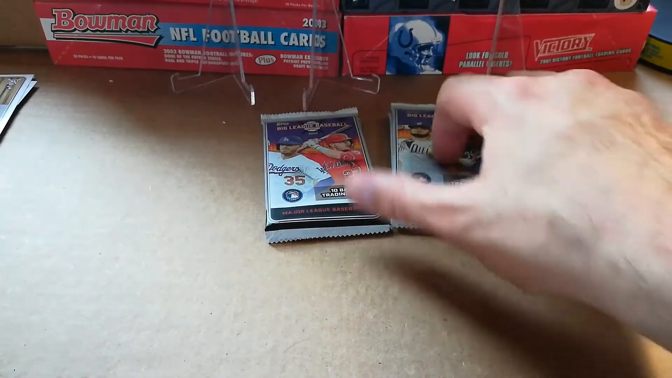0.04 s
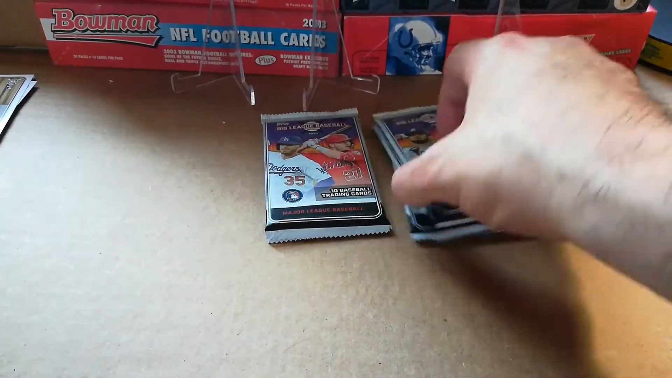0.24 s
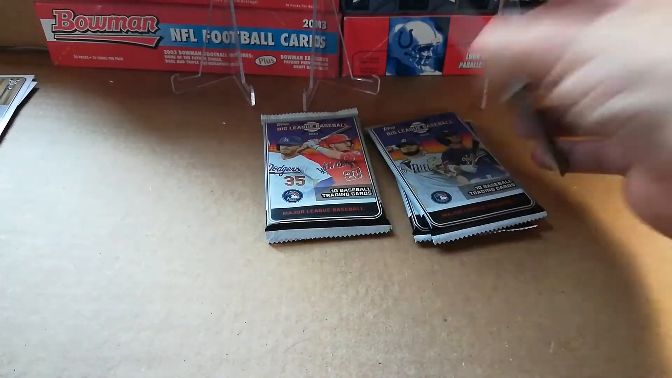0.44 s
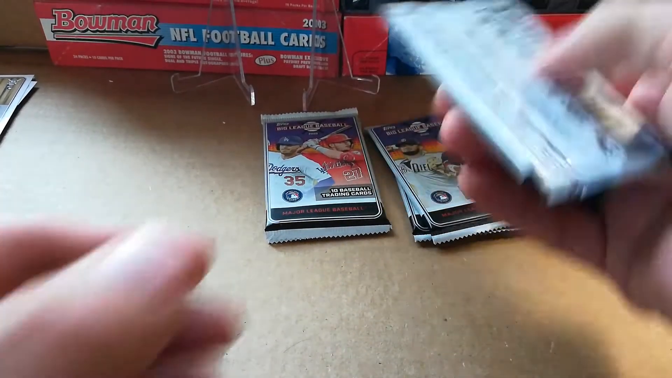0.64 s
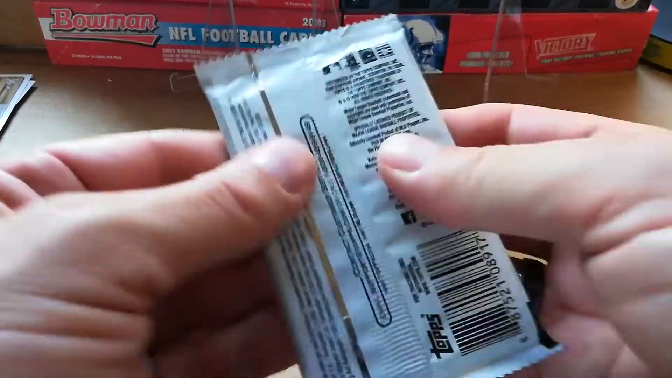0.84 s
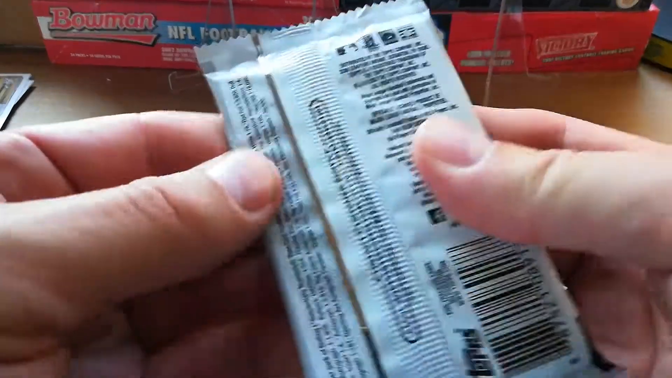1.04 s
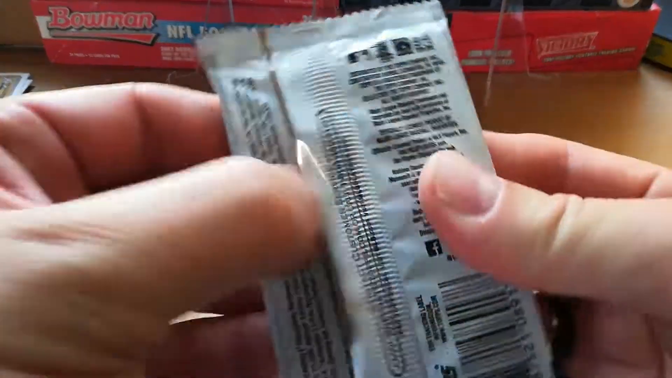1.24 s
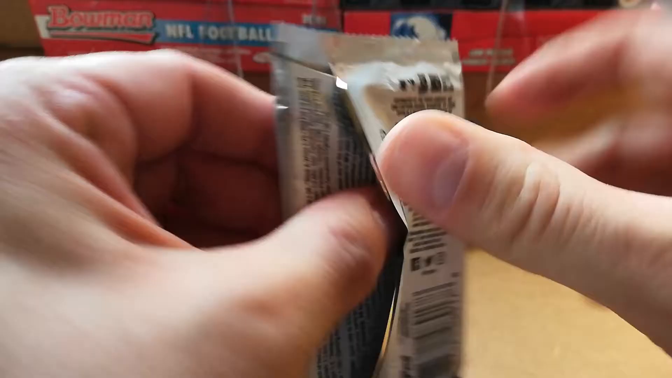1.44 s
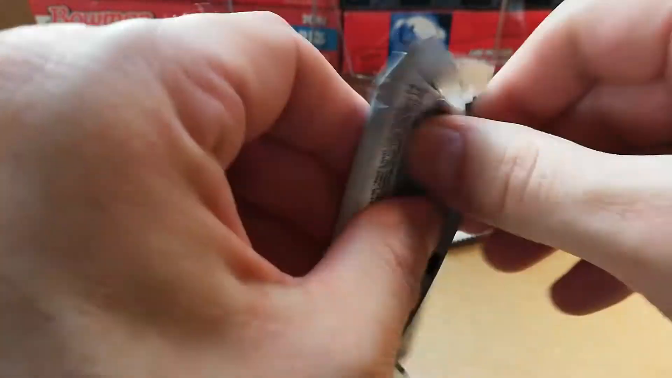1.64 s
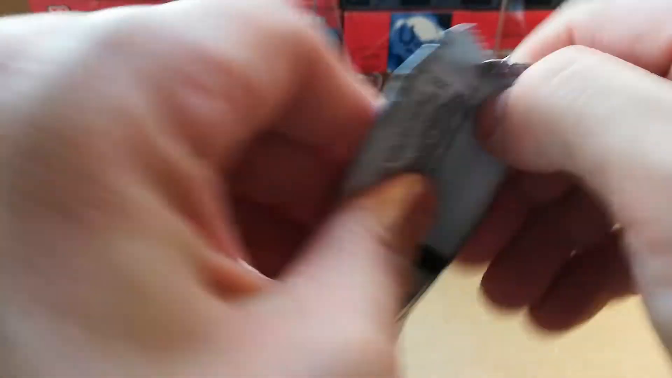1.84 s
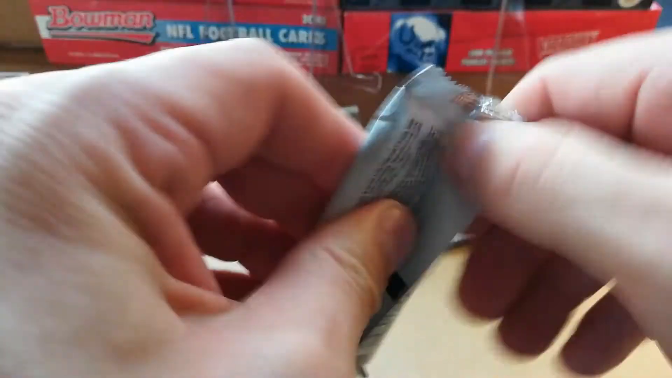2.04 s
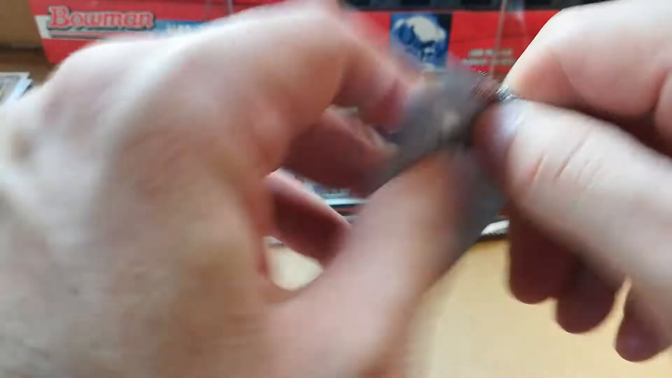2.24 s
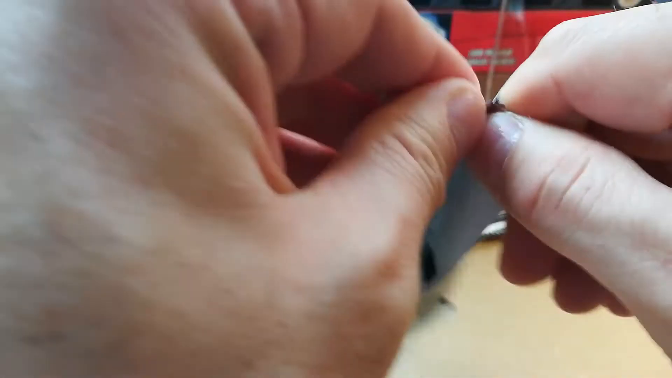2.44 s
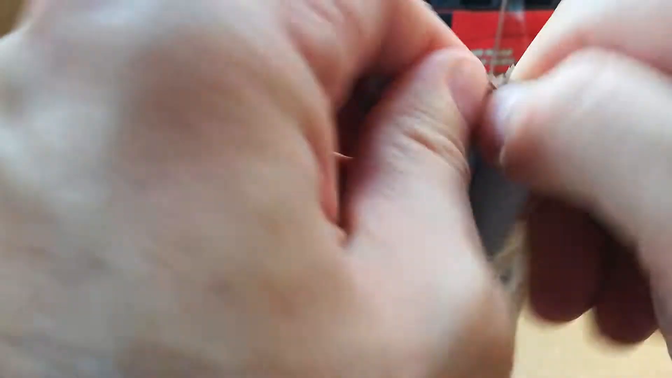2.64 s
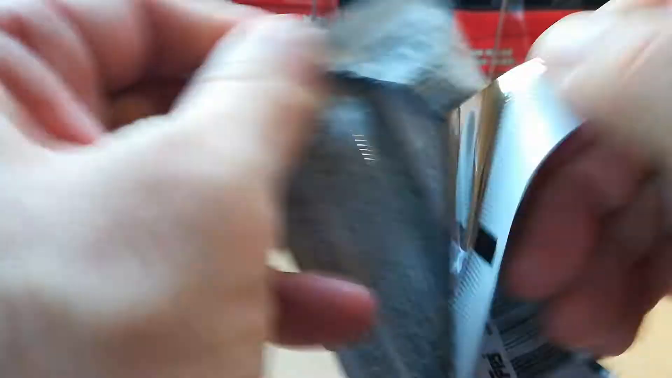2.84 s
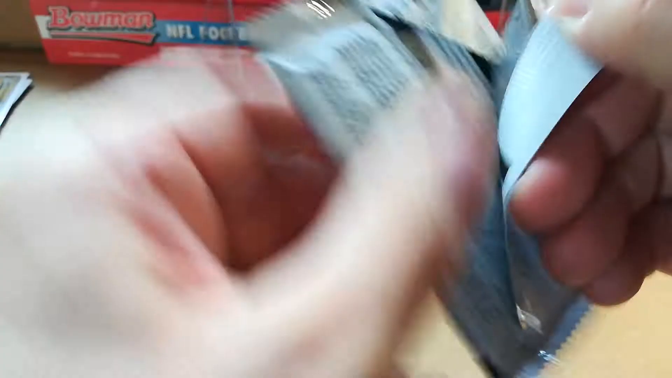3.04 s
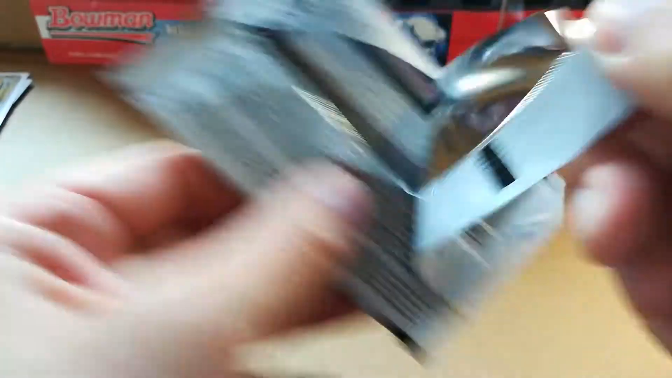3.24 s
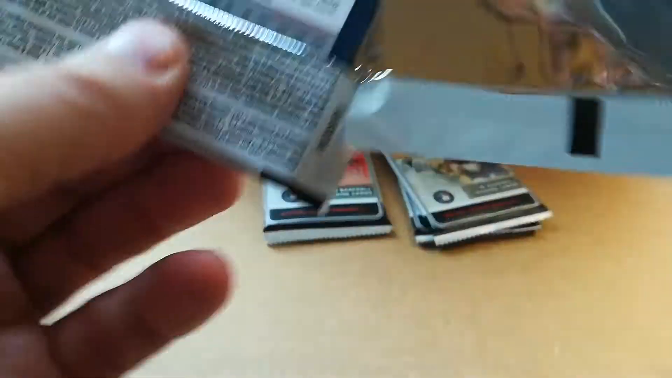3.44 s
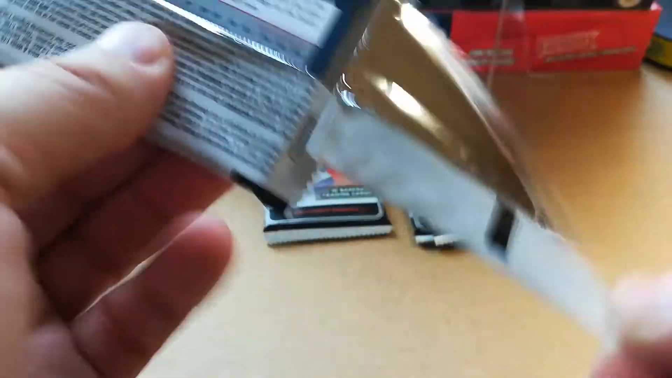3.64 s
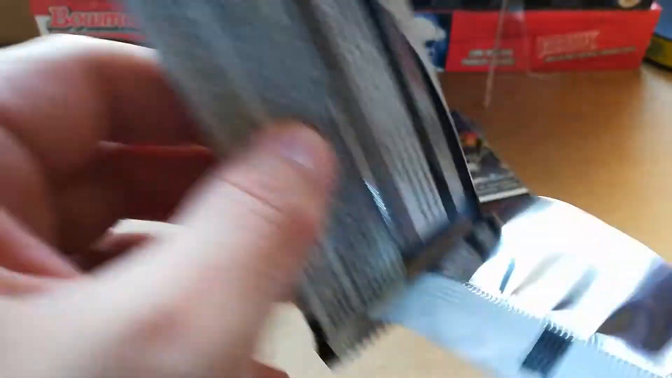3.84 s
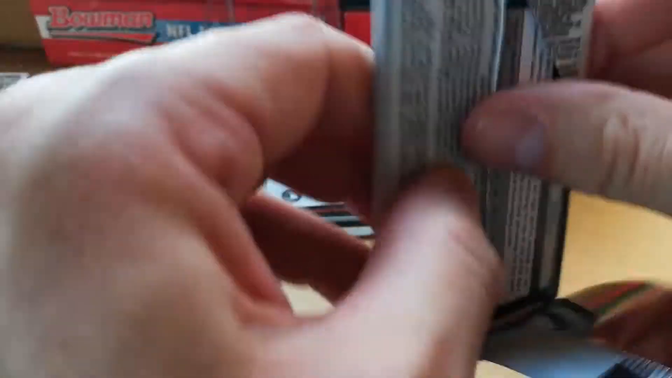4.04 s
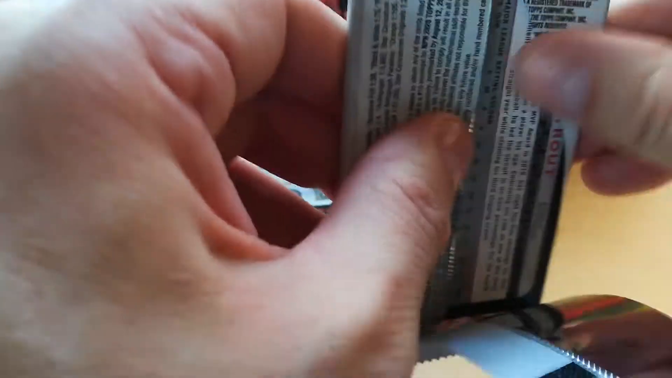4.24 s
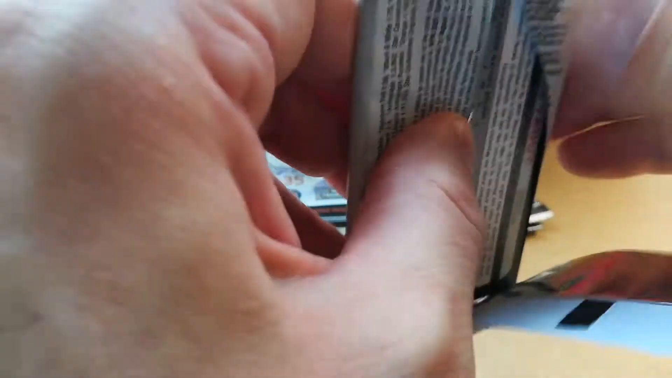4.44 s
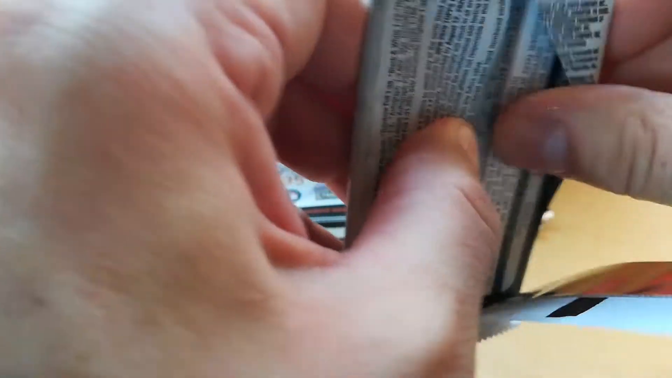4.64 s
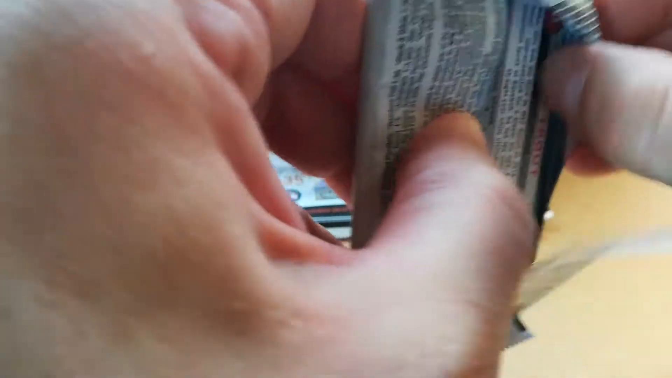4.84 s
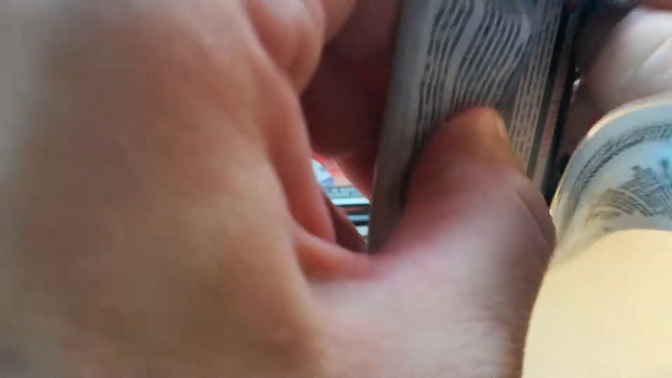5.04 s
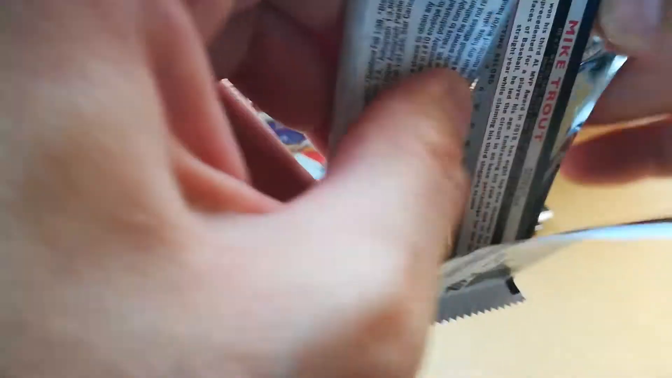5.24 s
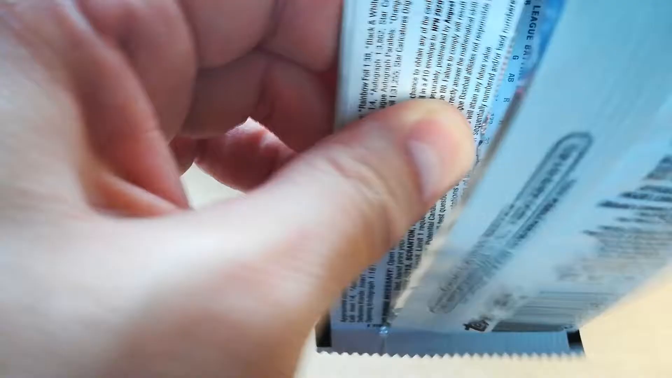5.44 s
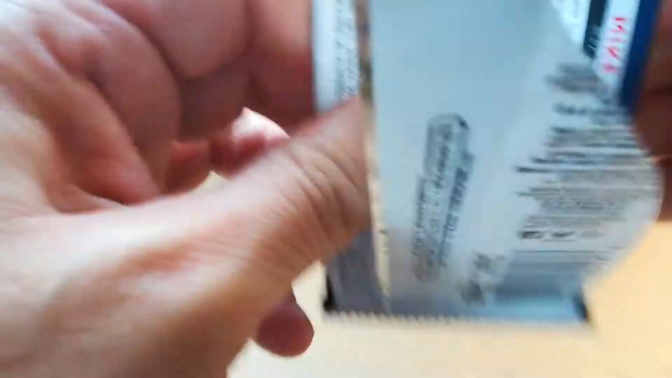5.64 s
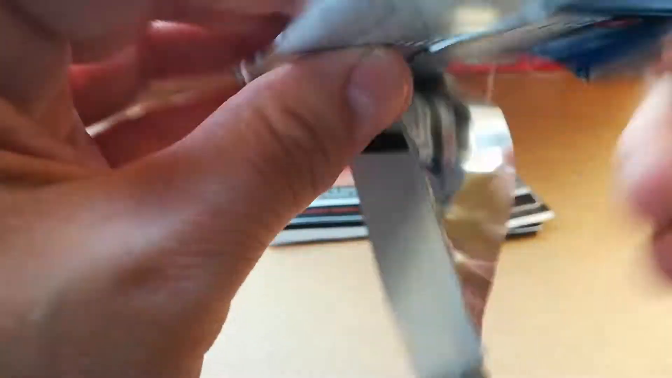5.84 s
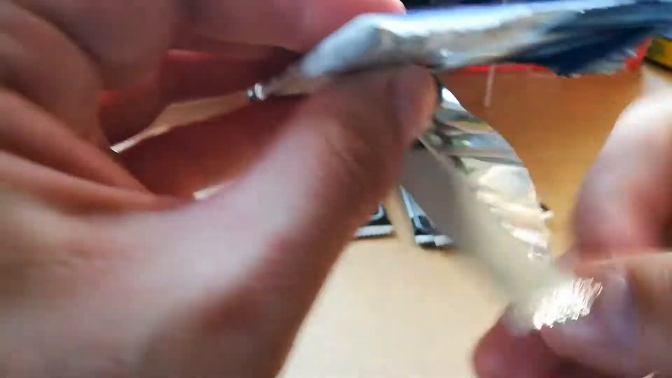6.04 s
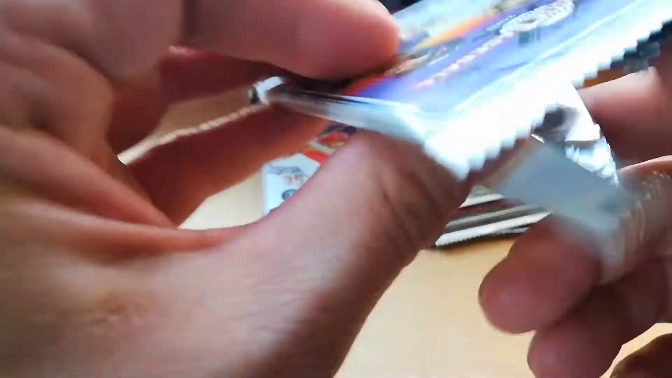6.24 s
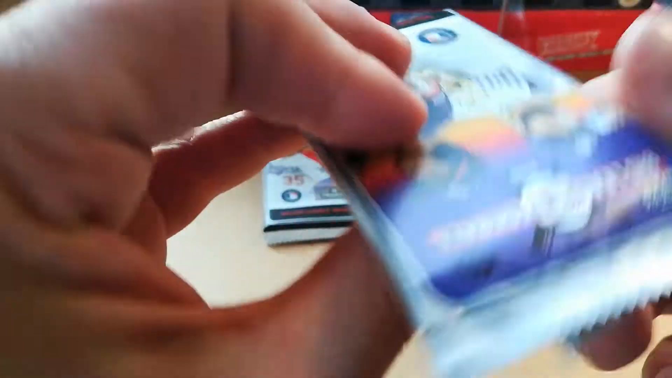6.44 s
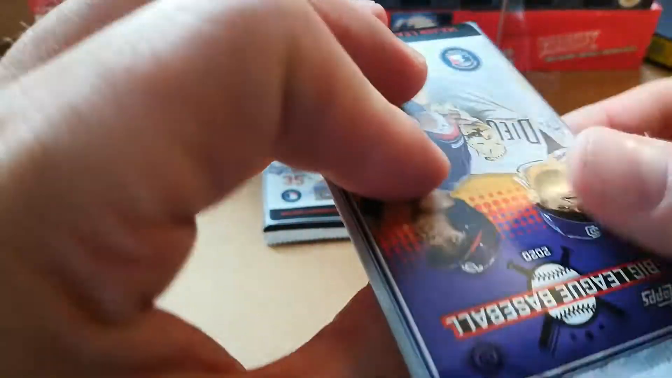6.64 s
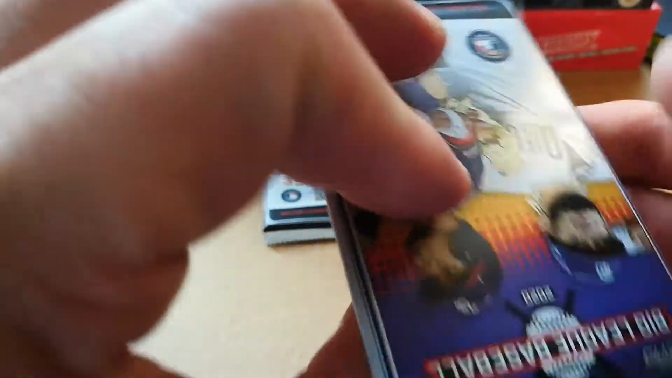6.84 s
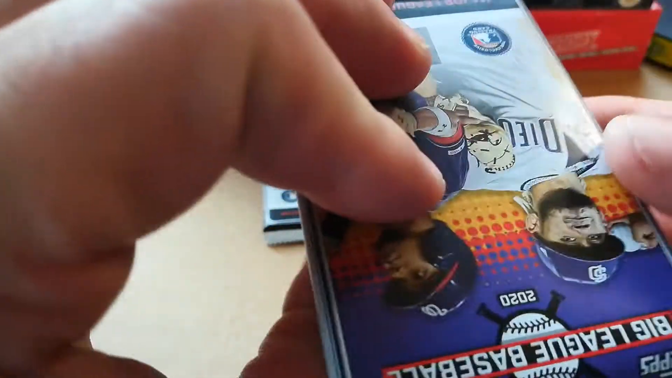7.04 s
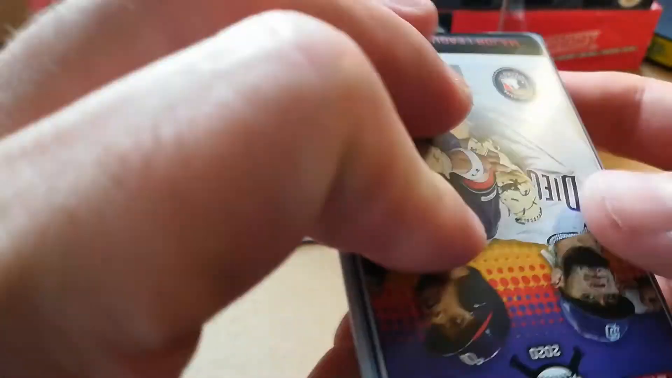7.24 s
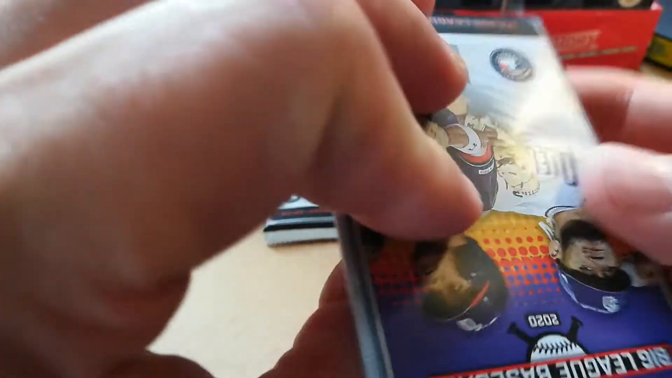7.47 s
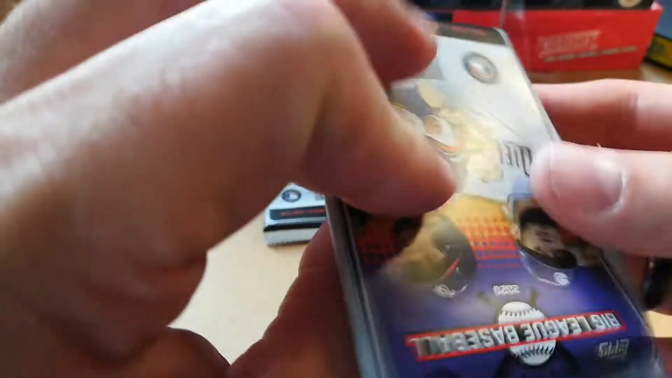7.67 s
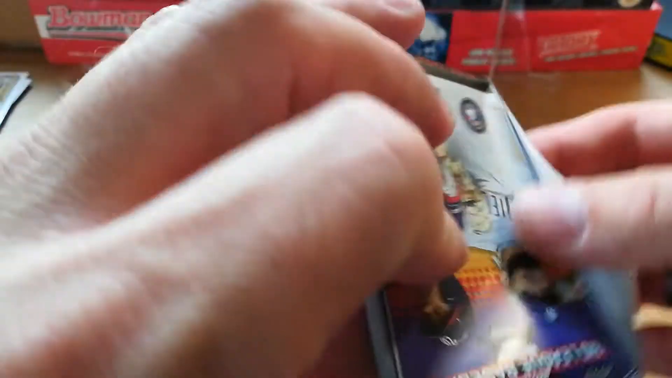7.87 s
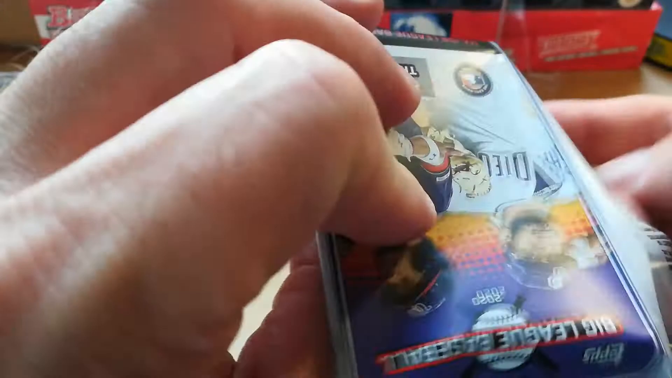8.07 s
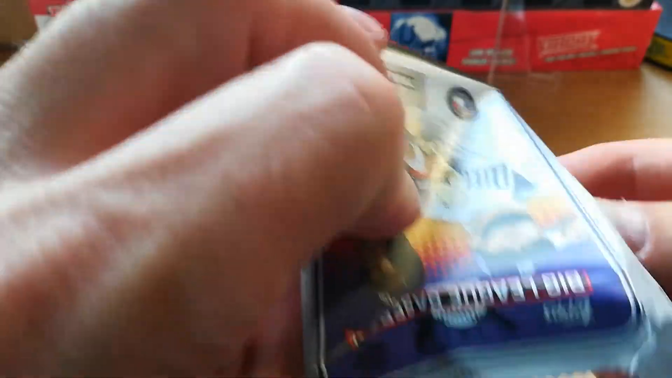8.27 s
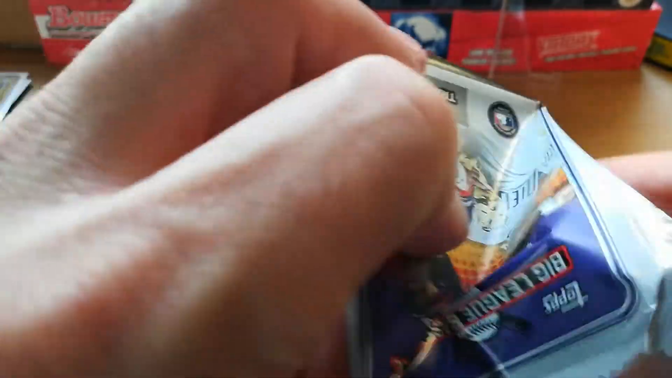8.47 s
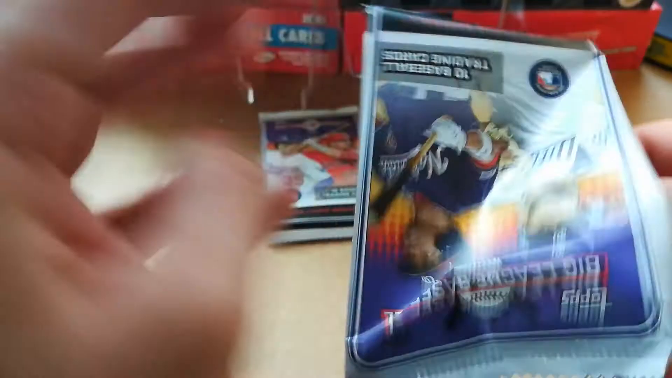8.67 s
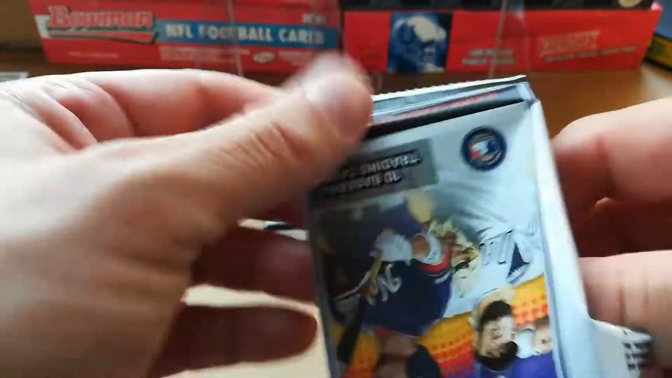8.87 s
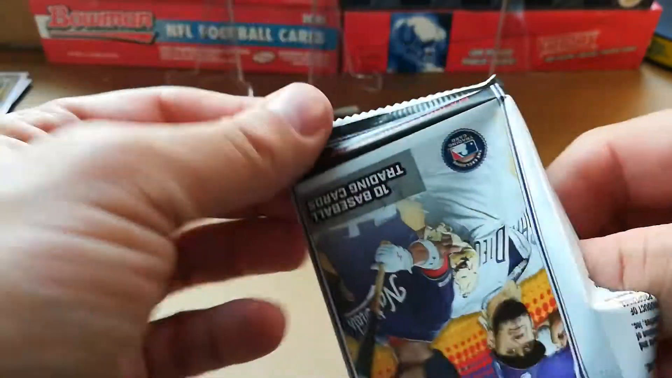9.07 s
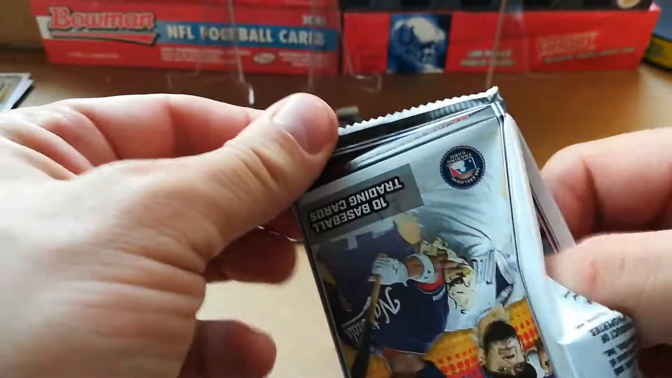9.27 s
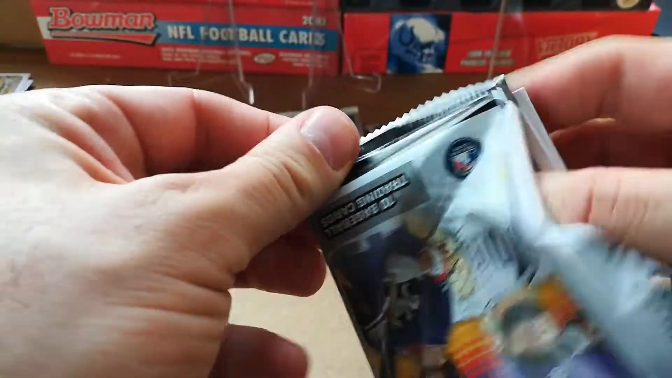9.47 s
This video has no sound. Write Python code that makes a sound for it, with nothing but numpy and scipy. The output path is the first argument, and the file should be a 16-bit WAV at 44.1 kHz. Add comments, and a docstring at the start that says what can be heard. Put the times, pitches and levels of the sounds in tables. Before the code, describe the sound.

Hands pick up a small foil pack of cards with a soft finger thud on the table and a light rustle. They work at the seam, and the foil crinkles in uneven bursts of sharp, bright snaps. About halfway, the seam peels with one brief squeak and a tiny run of ticks. The wrapper keeps crinkling as it is torn open, with faint taps on the cards. The microphone is very close, in a quiet, softly humming room.

```python
"""Hands pick up a small foil pack close to a phone; fingers thud on the table and tap the cards inside.
From 1.3 s they work at the seam: creases buckle with sharp snaps over a finer rustle.
At 4.8 s the seam peels in slips and squeaks once, then the ridges of its crimp let go one by one.
The pack is torn open, crinkling on to the end.
Throughout, a quiet room hums beneath and the foil rings the microphone ports near 8 kHz."""
import sys
import numpy as np
from scipy import signal
from scipy.io import wavfile
from scipy.ndimage import uniform_filter1d

SR = 44100
rng = np.random.default_rng(int(sys.argv[2]) if len(sys.argv) > 2 else 0)


def log_audio(samples):
    """Write samples as a 16-bit WAV file to the path given in sys.argv[1]."""
    # one column per channel
    frames = np.atleast_2d(samples).T
    # limit to full scale, then quantise
    limited = np.clip(frames, -1, 1)
    pcm = np.round(limited * 32767).astype(np.int16)
    wavfile.write(sys.argv[1], SR, pcm)


N = 419391

# large creases buckling: (time [s], level [dB])
CREASE_SNAPS = [(0.1793, -20.5), (0.248, -23), (0.276, -24), (0.3145, -31.5), (0.5715, -24.5),
                (0.8556, -34), (0.8864, -30), (1.1389, -28.5), (1.2696, -22.5), (1.287, -20),
                (1.2916, -17.5), (1.3022, -14), (1.3113, -12.5), (1.3153, -15), (1.3344, -17.5),
                (1.3955, -20), (1.5937, -24), (1.6532, -18.5), (1.6581, -19), (1.6664, -17), (1.6795, -29),
                (1.6888, -13.5), (1.7366, -16.5), (1.7457, -17), (1.7692, -13.5), (1.7738, -14.5),
                (1.7961, -21), (1.8316, -20.5), (1.842, -21), (1.855, -16), (1.8659, -19.5), (1.8693, -27),
                (1.9097, -18), (1.9263, -21.5), (1.943, -15), (1.957, -20), (1.9668, -22), (2.0302, -26),
                (2.0363, -17), (2.0417, -12), (2.0465, -15.5), (2.0702, -13.5), (2.0751, -14),
                (2.1356, -19), (2.1488, -17), (2.1734, -31), (2.2134, -23), (2.2288, -21.5), (2.2407, -14),
                (2.2912, -22.5), (2.2955, -16.5), (2.3253, -25.5), (2.3459, -33), (2.3512, -17),
                (2.359, -16), (2.3703, -25), (2.388, -18), (2.4517, -32), (2.4812, -26), (2.5636, -28.5),
                (2.6008, -28), (2.6195, -7), (2.6517, -15), (2.6805, -18), (2.6958, -18), (2.718, -16),
                (2.7477, -6.5), (2.7508, -16), (2.7622, -14), (2.807, -12.5), (2.8256, -12.5),
                (2.8809, -10), (2.8979, -21), (2.9352, -28), (2.9442, -24), (2.9486, -19), (2.9603, -25),
                (3.007, -25), (3.019, -17), (3.0267, -29), (3.0318, -17.5), (3.042, -21), (3.0546, -19),
                (3.1324, -17.5), (3.1363, -20), (3.2091, -15), (3.2505, -19.5), (3.2768, -17),
                (3.311, -21.5), (3.3447, -15), (3.3496, -16), (3.3532, -18.5), (3.3652, -16), (3.3776, -21),
                (3.3996, -14.5), (3.484, -22), (3.4948, -20.5), (3.5533, -26), (3.5752, -28),
                (3.5856, -31.5), (3.6215, -29), (3.6651, -31.5), (3.6941, -19.5), (3.7057, -22),
                (3.7318, -30), (3.7507, -30), (3.761, -25), (3.773, -26), (3.8013, -24.5), (3.8889, -32),
                (3.9455, -24), (4.0557, -23.5), (4.0716, -17), (4.1994, -14.5), (4.6807, -9.5),
                (4.6968, -16), (4.7221, -14), (4.7496, -16.5), (4.7892, -12), (4.8623, -27), (4.867, -19),
                (4.8761, -31), (4.8851, -12.5), (4.9769, -21.5), (4.9947, -19), (5.0053, -16),
                (5.0077, -25), (5.0116, -13), (5.0225, -15), (5.0505, -24), (5.068, -35), (5.0773, -22.5),
                (5.0985, -16.5), (5.15, -20), (5.1675, -23), (5.1819, -15), (5.1851, -17), (5.1956, -19.5),
                (5.2173, -21.5), (5.222, -26), (5.2765, -13.5), (5.2887, -21), (5.3275, -15.5),
                (5.3644, -11.5), (5.3802, -24), (5.3868, -23), (5.4292, -24), (5.445, -15), (5.4476, -20.5),
                (5.459, -24), (5.4835, -12), (5.499, -21), (5.556, -20), (5.5677, -9.5), (5.5763, -20.5),
                (5.5946, -17), (5.6726, -41), (5.6736, -34), (5.7037, -17.5), (5.719, -14), (5.7251, -14),
                (5.765, -23.5), (5.845, -25), (5.898, -27.5), (5.9598, -18.5), (6.028, -27.5),
                (6.1974, -12), (6.238, -27), (6.2862, -29), (6.6555, -29), (6.746, -27), (6.7661, -27),
                (6.7772, -27), (6.8422, -18), (6.868, -14), (6.9352, -20), (6.9778, -16.5), (7.0468, -30),
                (7.0736, -24.5), (7.2234, -26), (7.417, -31), (7.6868, -22.5), (7.7198, -15.5),
                (7.7264, -19.5), (7.7349, -17.5), (7.7441, -17.5), (7.811, -28), (7.8301, -15.5),
                (7.9268, -19), (7.944, -21), (7.994, -14.5), (8.0301, -10.5), (8.0845, -33),
                (8.1298, -13.5), (8.1522, -23), (8.1642, -15), (8.2575, -22.5), (8.326, -35), (8.4051, -21),
                (8.4465, -28), (8.459, -19), (8.4994, -22), (8.5161, -21), (8.522, -18.5), (8.5428, -23),
                (8.6987, -20.5), (8.8283, -21), (8.839, -24.5), (8.8605, -25), (8.8663, -21), (9.0002, -18),
                (9.0178, -20), (9.1328, -23), (9.231, -30), (9.2845, -43), (9.31, -46), (9.3349, -25.5),
                (9.368, -21), (9.376, -18), (9.3863, -12.5), (9.399, -12), (9.4442, -17)]


def snaps(panels_db=-2.5, body_db=-6.5, crimp_s=4.8915, ridge_gap_s=.0081, ridge_db=-17.5, step_db=-1.6):
    """Large creases and crimp ridges snap; the stroke sets how much panels and body answer."""
    drive = np.zeros((3, 2, N))  # foil, panels, body
    gains = fingers()[:3]
    ridges = [(crimp_s + k * ridge_gap_s, ridge_db + k * step_db) for k in range(8)]
    for at_s, db in CREASE_SNAPS + ridges:
        jolt = buckle()
        answer = gains[:, int(at_s * SR)] / gains[0, int(at_s * SR)]
        answer *= amp(rng.normal([0, panels_db, body_db], [0, 2.5, 2.5]))
        answer *= rng.choice([-1, 1], 3)  # random polarity per layer: they blend without a hollow notch
        add(drive, at_s, amp(db) * answer[:, None, None] * jolt)
    drive[0] = signal.lfilter([1, -.12], [1], drive[0])  # sharper edges than small creases: more treble
    return drive


def buckle(rise_s=.00013, jolt_t60_s=.0078, ring_t60_s=.014, echo_s=.0025, echo_db=-15, alike=.53):
    """One crease flips: a spike, a jolt of noise, the brief ring of its facet, an echo off the table."""
    t = np.arange(500) / SR
    shared, own = rng.standard_normal(500), rng.standard_normal((2, 500))
    jolt = (alike * shared + np.sqrt(1 - alike ** 2) * own) * amp(-60 * t / jolt_t60_s)
    facet_hz = 2300 * 3 ** rng.random()
    ring = amp(-9 - 60 * t / ring_t60_s) * np.sin(2 * np.pi * (facet_hz * t + rng.random((2, 1))))
    pop = (jolt + ring) * np.tanh(t / rise_s) ** 2
    pop[:, 6] += 3.42 * rng.choice([-1, 1])  # spike
    pop += amp(echo_db) * np.roll(pop[::-1], int(echo_s * SR), axis=1)
    pop /= np.sqrt(np.mean(pop[:, :60] ** 2))
    return np.array([pop[0], np.roll(pop[1], rng.integers(1, 9))])  # later at the right port


def rustle(pops_per_s=300, spread_db=3, tilt_db=13, flutter_db=3.5, clump_db=3.5):
    """Small creases pop in clumps, some brighter, some duller; skin sliding on foil hisses."""
    *gains, creasing = fingers()
    shapes = [buckle()[:, :300] for _ in range(64)]
    draws = rng.random((12000, 5))
    times_s = np.cumsum(-np.log(1 - draws[:, 0])) / pops_per_s
    levels_db = spread_db * np.minimum(-np.log(1 - draws[:, 1]), 4)
    pops = np.zeros((3, 2, N))  # foil, panels, body
    for at_s, db, (shape, panels, body) in zip(times_s[times_s < N / SR], levels_db, draws[:, 2:]):
        answer = amp(db + tilt_db * np.array([0, panels - .5, body - .5])) * [1, rng.choice([-1, 1]), 1]
        add(pops, at_s, answer[:, None, None] * shapes[int(shape * len(shapes))])
    hiss = amp(flutter_db * smooth_noise(N, 300, 300)) * rng.standard_normal((2, N))
    hiss = amp([0, -1, -1])[:, None, None] * hiss  # sliding stirs panels and body less
    clumps = unit_rms(pops * amp(clump_db * smooth_noise(N, 500, 500)))
    drive = creasing * clumps + (1 - creasing) ** 2 * hiss
    return drive * np.array(gains)[:, None]


# finger pushes and slides:
# (start [s], hold [s], rustle [dB], panels re rustle [dB], body re rustle [dB], creasing share [0-1])
FINGER_STROKES = [(0.0, 0.0028, -38, -8.5, 1.5, 0.39), (0.113, 0.2, -37, -3, -9, 0.36),
                  (0.34, 0.0069, -57, -13, 11.5, 0.2), (0.577, 0.13, -40.5, -18, -30, 0.36),
                  (0.737, 0.049, -36.5, -9.5, -18.5, 0.23), (0.85, 0.033, -38.5, -9.5, -14.5, 0.67),
                  (0.934, 0.055, -42, -17, -22, 0.26), (1.06, 0.12, -44, -7, -11.5, 0.51),
                  (1.298, 0.0052, -22.5, -9.5, -16.5, 0.41), (1.399, 0.014, -37, -9.5, -16, 0.25),
                  (1.602, 0.033, -34, -5.5, -12, 0.46), (1.652, 0.31, -28, -11.5, -21, 0.48),
                  (1.847, 0.0039, -18, -7.5, -24.5, 0.48), (2.045, 0.03, -27, -10.5, -20, 0.43),
                  (2.131, 0.29, -33, -8, -19, 0.56), (2.355, 0.021, -28.5, -5.5, -28, 0.25),
                  (2.442, 0.038, -31.5, -22, -26, 0.68), (2.561, 0.19, -31.5, -13.5, -26, 0.56),
                  (2.752, 0.084, -25, -8, -14.5, 0.37), (2.893, 0.066, -32.5, -2.5, -10, 0.57),
                  (3.025, 0.0083, -24, -6.5, -16.5, 0.4), (3.126, 0.0044, -34, -3, -8, 0.14),
                  (3.217, 0.022, -27.5, -5, -12.5, 0.65), (3.298, 0.13, -29.5, -9.5, -14.5, 0.45),
                  (3.504, 0.25, -40, -5, -9, 0.98), (3.754, 0.006, -28, -9, -12.5, 0.6),
                  (3.955, 0.037, -50.5, -12, -20, 0.51), (4.055, 0.28, -38.5, -12, -17, 0.5),
                  (4.2, 0.06, -34, -11, -16, 0.29), (4.392, 0.057, -44, -16.5, -16, 0.29),
                  (4.647, 0.033, -53.5, -20, 4, 0.51), (4.687, 0.18, -31, -11.5, -20, 0.49),
                  (4.777, 0.085, -44, 6, -29, 0.98), (4.873, 0.13, -37, -7.5, -8, 0.91),
                  (5.005, 0.052, -26, -7.5, -13.5, 0.57), (5.155, 0.028, -25, -8, -9, 0.72),
                  (5.284, 0.48, -33.5, -8.5, -12.5, 0.66), (5.6, 0.087, -28, -10.5, -9, 0.5),
                  (5.7, 0.014, -27.5, -3.5, -26, 0.26), (5.814, 0.033, -37, -13.5, -24, 0.61),
                  (6.11, 0.26, -40, -9.5, -22, 0.38), (6.2, 0.049, -36.5, -11, -23.5, 0.25),
                  (6.446, 0.069, -38, -13, -26, 0.23), (6.565, 0.36, -43, -11.5, -19.5, 0.41),
                  (6.748, 0.074, -34.5, -6.5, -21.5, 0.46), (6.845, 0.23, -32, -11.5, -19, 0.54),
                  (7.11, 0.06, -47.5, -12, -27, 0.19), (7.203, 0.065, -35, -13, -22, 0.37),
                  (7.394, 0.086, -40.5, -19.5, -26, 0.077), (7.5, 0.13, -46, -16, -17.5, 0.055),
                  (7.69, 0.14, -42, -7, -12.5, 0.33), (7.92, 0.4, -33.5, -9, -17, 0.5),
                  (8.223, 0.12, -39, -3, -11.5, 0.19), (8.387, 0.025, -30, -11.5, -17, 0.54),
                  (8.45, 0.0093, -33.5, -5.5, -22.5, 0.26), (8.523, 0.014, -30, 1, -9, 0.39),
                  (8.655, 0.05, -31.5, -6.5, -17.5, 0.28), (8.848, 0.089, -33.5, -7.5, -15.5, 0.3),
                  (8.999, 0.012, -27.5, -0.5, -15, 0.44), (9.145, 0.013, -36, -13, -17, 0.38),
                  (9.277, 0.28, -38.5, -1, -17, 0.55), (9.353, 0.014, -26.5, -12.5, -18.5, 0.37)]


def fingers(rise_db_per_s=454, fall_db_per_s=310):
    """Strokes swell, hold and fade. Returns foil, panel and body gains and the creasing share."""
    start_s, hold_s, db, panels_db, body_db, creasing = np.transpose(FINGER_STROKES)[:, :, None]
    t = np.arange(0, N + 44, 44) / SR
    rise_db = rise_db_per_s * np.maximum(start_s - t, 0)
    fall_db = fall_db_per_s * np.maximum(t - start_s - hold_s, 0)
    power = amp(np.maximum(db - rise_db - fall_db, -150)) ** 2
    gains = [np.sqrt((power * amp(part_db) ** 2).sum(0)) for part_db in (0, panels_db, body_db)]
    share = (power * creasing).sum(0) / power.sum(0)
    return np.array([np.interp(np.arange(N) / SR, t, curve) for curve in gains + [share]])


# creases heard through the ports: (frequency [Hz], density [dB])
FOIL_SPECTRUM = [(2650, -48), (4500, -8), (6400, 0), (7700, 6.5), (9300, -5), (11200, -17.5),
                 (14600, -23.5), (15600, -29), (16500, -67.5)]
# larger foil panels: (frequency [Hz], density [dB])
PANEL_SPECTRUM = [(1290, -44.5), (2200, -9.5), (3710, -5), (4190, 3.5), (4600, 1.5), (5980, -35.5),
                  (10100, -120)]
# body of the pack of cards: (frequency [Hz], density [dB])
BODY_SPECTRUM = [(88, -40.5), (150, -15), (330, -9.5), (481, -15.5), (823, -7.5), (1300, -4), (1700, -1.5),
                 (2100, -8), (2990, -56), (5060, -120)]


def crinkle():
    """Snaps and rustle ring the foil, its larger panels and the body of the pack."""
    foil, panels, body = snaps() + rustle()
    return (colour(foil, FOIL_SPECTRUM) + retune(panels, PANEL_SPECTRUM, ratio=.858)
            + retune(body, BODY_SPECTRUM, ratio=.95))


def retune(drive, spectrum, ratio):
    """Folding retunes the sheet: a random drift between a higher and a lower copy of its spectrum."""
    blend_rad = np.pi / 4 * (1 + np.tanh(2 * smooth_noise(N, 2000)))
    higher = colour(drive * np.cos(blend_rad), [(hz / ratio, db) for hz, db in spectrum])
    lower = colour(drive * np.sin(blend_rad), [(hz * ratio, db) for hz, db in spectrum])
    return higher + lower


# steps of the peel: (start [s], slip rate [Hz], level [dB])
PEEL_STEPS = [(4.763, 2680, -30), (4.789, 1832, -27.5), (4.805, 1312, -30.5), (4.818, 857, -37),
              (4.837, 336.5, -36)]
# seam resonances: (frequency [Hz], density [dB])
SEAM_SPECTRUM = [(900, -21), (1700, -1.5), (2100, 0.5), (2550, 5.5), (3300, -4), (5200, 3.5), (6200, 0),
                 (7500, 6), (10500, -19)]


def peel(end_s=4.861, sag_per_s=4, jitter=.025, flutter_db=4.5):
    """Each slip jolts the seam: first fast enough to squeak, then dropping by steps to a rasp."""
    start_s, rate_hz, db = np.transpose(PEEL_STEPS)
    t = np.arange(start_s[0], end_s, 1 / SR)
    step = np.searchsorted(start_s, t, "right") - 1
    wobble, flutter = smooth_noise((2, len(t)), 50)
    slip_hz = rate_hz[step] * (1 - sag_per_s * (t - start_s[step])) * (1 + jitter * wobble)
    cycles = np.cumsum(slip_hz) / SR - np.array([[0], [.3]])  # right lags
    slips = sum(np.cos(2 * np.pi * k * cycles) * (k * slip_hz < 12000) for k in range(1, 40))
    gain = np.sqrt(slip_hz / 6000) * amp(db[step] + flutter_db * flutter)
    drive = np.zeros((2, N))
    add(drive, start_s[0], gain * slips)
    return colour(drive, SEAM_SPECTRUM)


# fingers knock the table (low) and tap the cards (high): (time [s], level [dB], pitch [Hz])
FINGER_KNOCKS = [(0.094, -32.5, 85), (0.216, -41, 85.6), (0.352, -40.5, 990), (0.775, -36.5, 910),
                 (0.85, -46, 98), (2.889, -42, 108), (3.118, -42, 158), (3.284, -40, 222),
                 (3.609, -45, 206), (3.665, -40, 166), (3.745, -37, 342), (4.049, -49, 90),
                 (4.124, -36, 920), (4.148, -42.5, 810), (4.595, -40.5, 1490), (5.148, -46, 328),
                 (5.36, -37, 184), (5.451, -44, 300), (5.496, -33, 315), (5.535, -35, 340),
                 (5.565, -42, 247), (5.695, -44, 59), (5.704, -33, 196), (6.188, -41.5, 221),
                 (6.806, -49, 183), (6.84, -42, 254), (7.003, -47.5, 250), (7.29, -44.5, 117),
                 (8.117, -47, 98), (8.323, -35, 900), (8.687, -40.5, 282)]


def thuds(decay_cycles=.71, scuff_gain=.48):
    """Soft blows ring unevenly for a cycle or two, alike at both ports."""
    out = np.zeros(N)
    for at_s, db, hz in FINGER_KNOCKS:
        cycles = np.arange(int(4 * SR / hz)) / SR * hz
        scuff = scuff_gain * smooth_noise(len(cycles), int(SR / hz / 2))
        envelope = cycles * np.exp(1 - cycles / decay_cycles)
        add(out, at_s, amp(db) * envelope * (np.sin(2 * np.pi * cycles) + scuff))
    return out


def walls(direct, t60_s=.2, delay_s=.004, tail_db=-21):
    """Nearby boxes and walls add a short, faint tail."""
    t = np.arange(SR // 4) / SR
    tail = rng.standard_normal((2, len(t))) * amp(-60 * t / t60_s) * (t > delay_s)
    tail /= np.linalg.norm(tail[0])
    return direct + amp(tail_db) * signal.oaconvolve(direct, tail, axes=1)[:, :N]


# room hum and hiss: (frequency [Hz], density [dB])
ROOM_SPECTRUM = [(20, -13.5), (85, 2), (140, -9.5), (320, -13), (600, -19), (1600, -22), (3000, -22.5),
                 (7500, -20.5), (12000, -31), (16500, -65)]
# left-right likeness of the room noise: (frequency [Hz], coherence [0-1])
ROOM_COHERENCE = [(60, 1), (200, .75), (500, .2), (1500, .2), (15000, 0)]


def room(level_db=-62.5, drift_db=1.5):
    """Steady hum and hiss, alike at both ports in the bass; patches of its spectrum drift slowly."""
    frames, hz = N // 512 + 5, np.fft.rfftfreq(2048, 1 / SR)
    left_re, left_im, own_re, own_im, patches = rng.standard_normal((frames, 1025, 5)).T
    patches = unit_rms(uniform_filter1d(uniform_filter1d(patches, 8, axis=0), 16, axis=1))
    alike = curve_at(ROOM_COHERENCE, hz)[:, None]
    left = left_re + 1j * left_im
    right = alike * left + np.sqrt(1 - alike ** 2) * (own_re + 1j * own_im)
    spectra = np.array([left, right]) * amp(curve_at(ROOM_SPECTRUM, hz)[:, None] + drift_db * patches)
    _, noise = signal.istft(spectra, nperseg=2048, noverlap=1536)
    return amp(level_db) * unit_rms(noise[:, :N])


def amp(db):
    """dB to gain."""
    return 10 ** (np.asarray(db) / 20)


def unit_rms(x):
    """Scales to rms 1."""
    return x / np.sqrt(np.mean(x ** 2) + 1e-20)


def smooth_noise(shape, *widths_samples):
    """Noise through moving averages, rms 1."""
    noise = rng.standard_normal(shape)
    for width in widths_samples:
        noise = uniform_filter1d(noise, width)
    return unit_rms(noise)


def curve_at(points, hz):
    """Interpolates over log frequency."""
    points_hz, values = np.transpose(points)
    return np.interp(np.log(hz + 1), np.log(points_hz + 1), values)


def add(mix, at_s, sound):
    """Mixes a sound in, in place."""
    part = mix[..., round(at_s * SR):][..., :sound.shape[-1]]
    part += sound[..., :part.shape[-1]]


def colour(x, spectrum):
    """Minimum-phase filter of energy 1."""
    hz = abs(np.fft.fftfreq(4096, 1 / SR))
    log_gain = np.log(amp(np.maximum(curve_at(spectrum, hz), -100)))
    taps = np.fft.ifft(np.exp(log_gain - 1j * signal.hilbert(log_gain).imag)).real[:2048]
    return signal.oaconvolve(x, taps[None] / np.linalg.norm(taps), axes=1)[:, :N]


# where the pack is held: (time [s], left minus right [dB])
PACK_PAN = [(0, -0.5), (1, 3), (1.5, 4.5), (2.5, 1), (3, 5), (4, -0.5), (5, 2), (6, -0.5), (7.5, 0.5),
            (8.5, 1), (9, 2), (9.5, 2)]


def scene():
    """The pack, moving in the hands, over table and room."""
    pan_db = np.interp(np.arange(N) / SR, *np.transpose(PACK_PAN))
    pack = (crinkle() + peel()) * amp([pan_db / 2, -pan_db / 2])
    return walls(pack) + thuds() + room()


def record(dry, limit=.8, cutoff_hz=16700):
    """The converter's limit, then the band limit."""
    taps = signal.firwin(1023, cutoff_hz, window=("kaiser", 12), fs=SR)
    return signal.oaconvolve(np.clip(dry, -limit, limit), taps[None], "same", axes=1)


dry = scene()
out = record(dry)
log_audio(out)
```